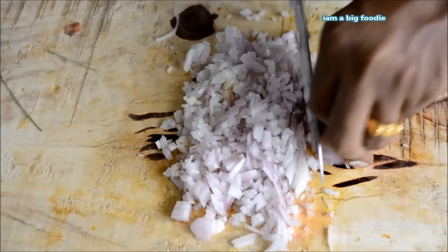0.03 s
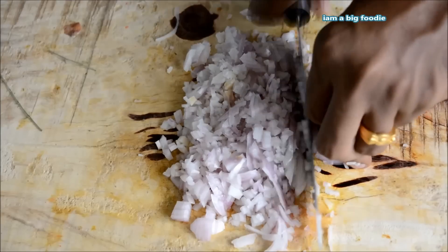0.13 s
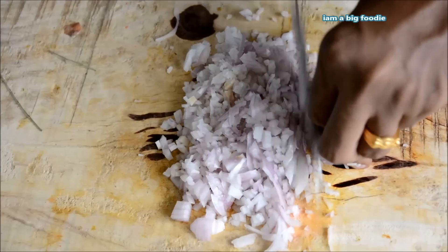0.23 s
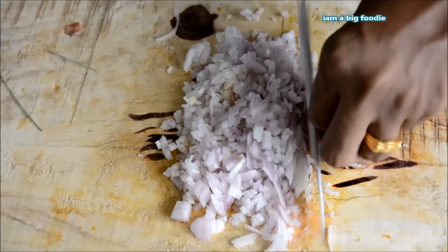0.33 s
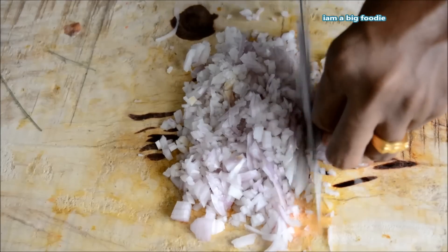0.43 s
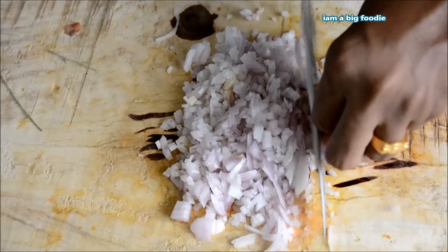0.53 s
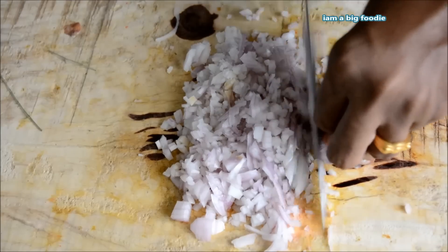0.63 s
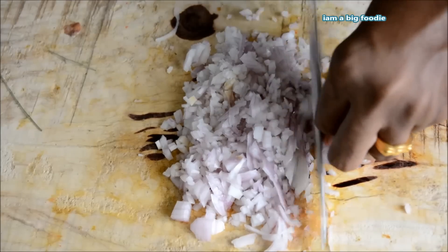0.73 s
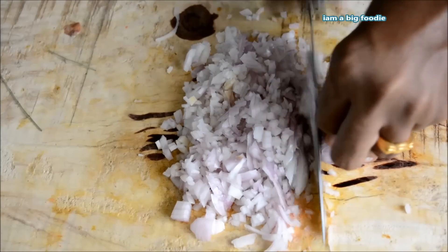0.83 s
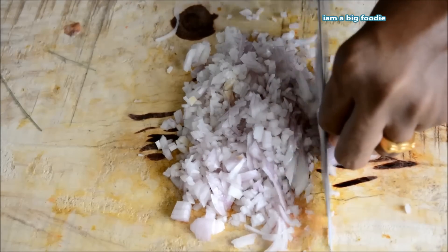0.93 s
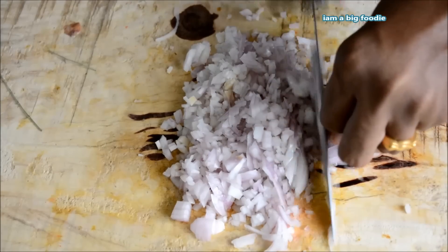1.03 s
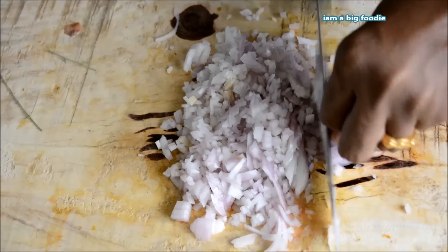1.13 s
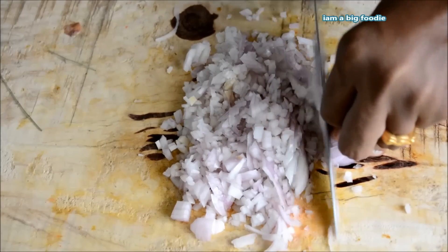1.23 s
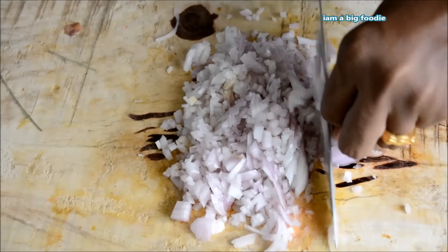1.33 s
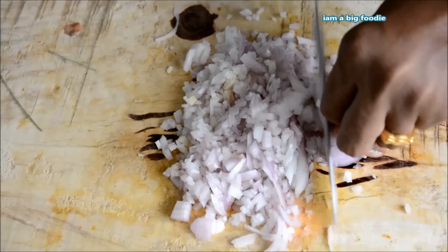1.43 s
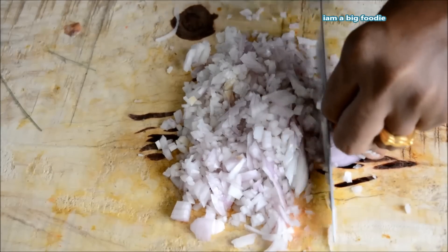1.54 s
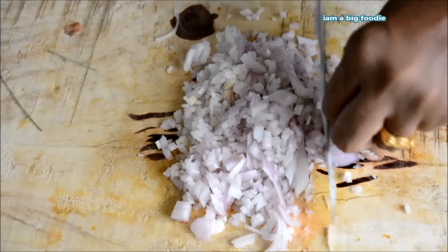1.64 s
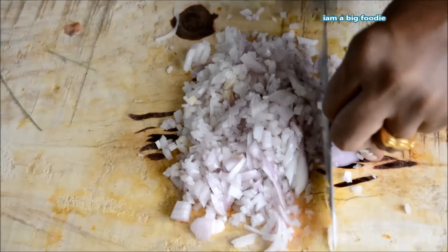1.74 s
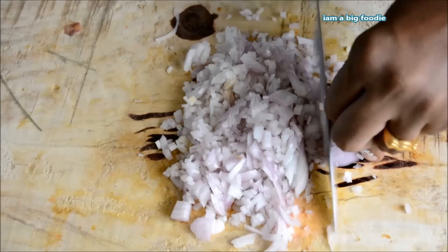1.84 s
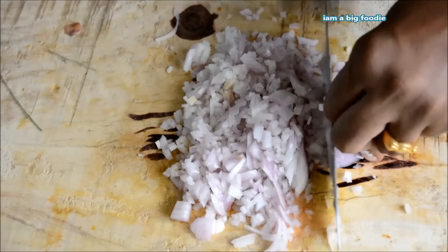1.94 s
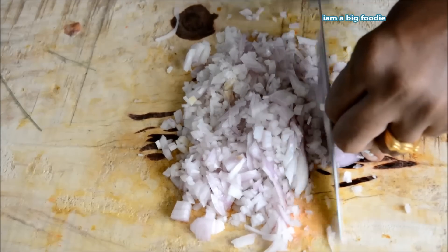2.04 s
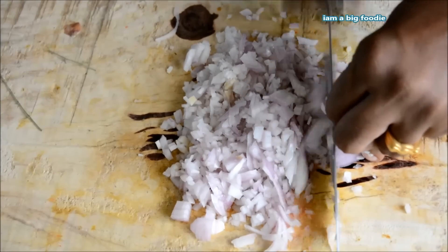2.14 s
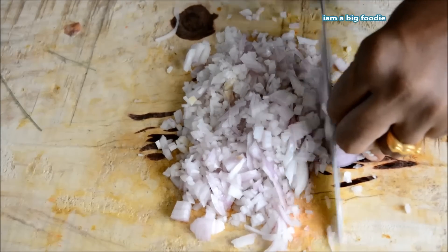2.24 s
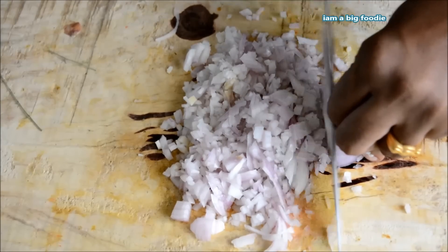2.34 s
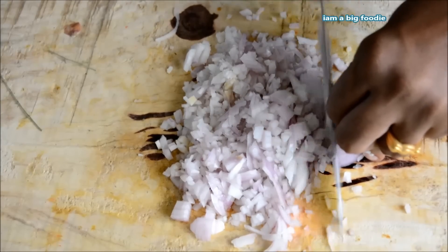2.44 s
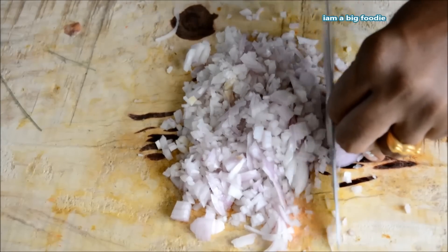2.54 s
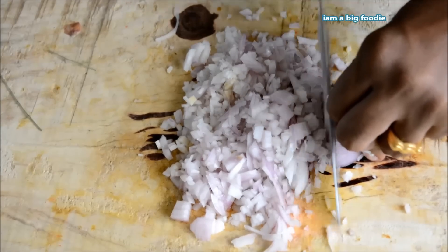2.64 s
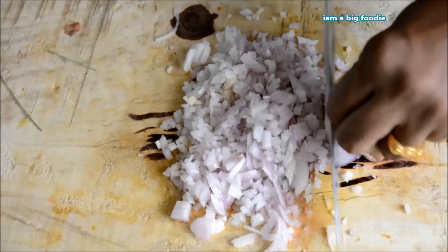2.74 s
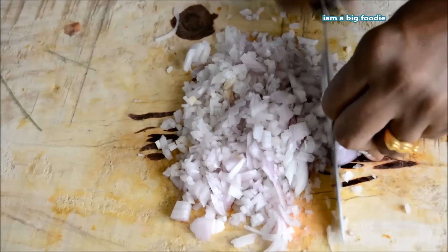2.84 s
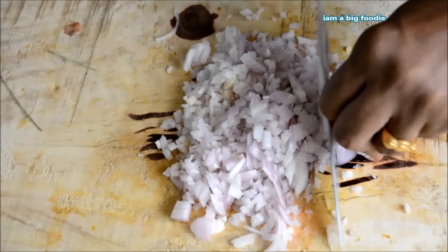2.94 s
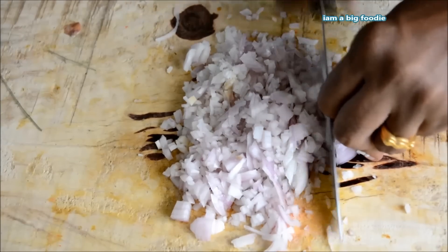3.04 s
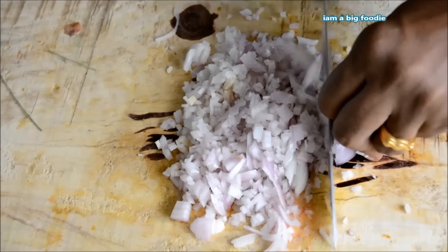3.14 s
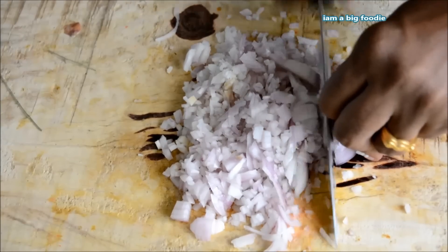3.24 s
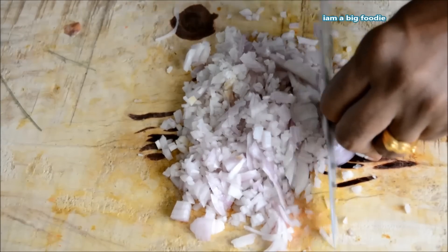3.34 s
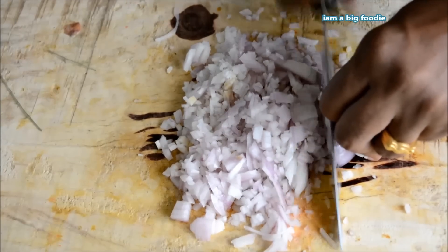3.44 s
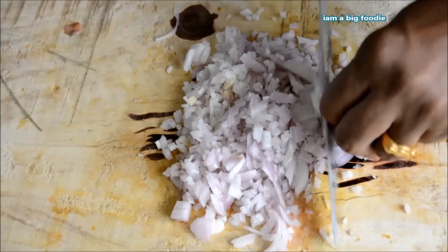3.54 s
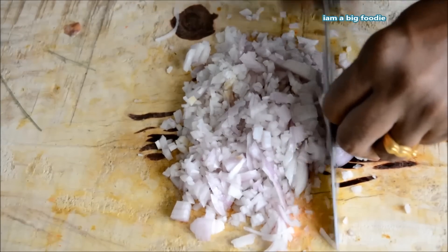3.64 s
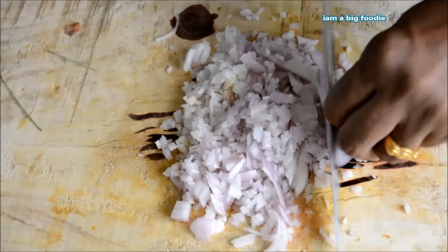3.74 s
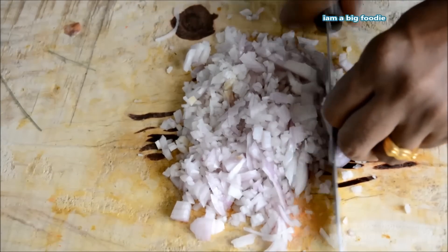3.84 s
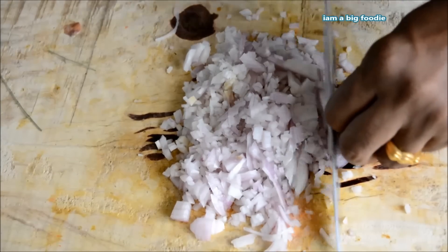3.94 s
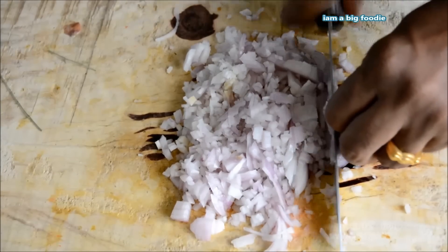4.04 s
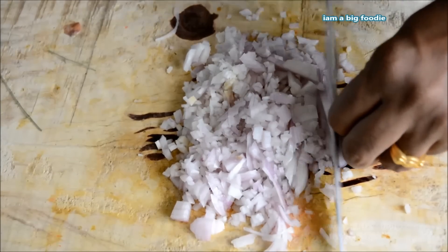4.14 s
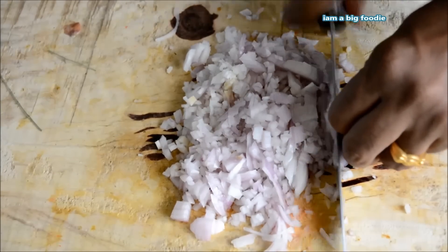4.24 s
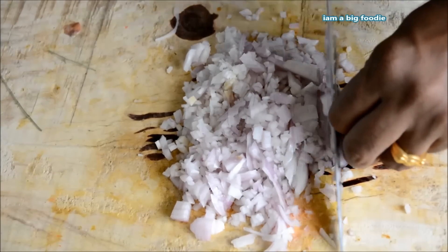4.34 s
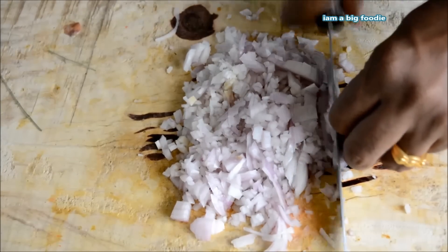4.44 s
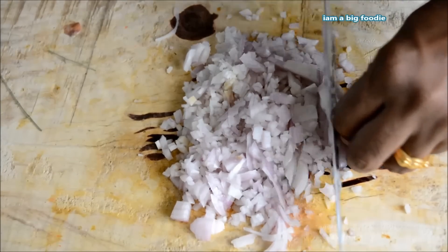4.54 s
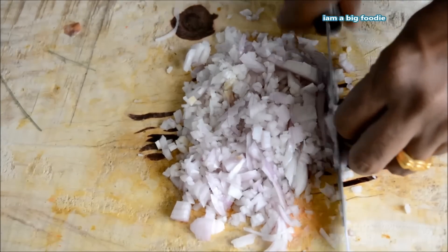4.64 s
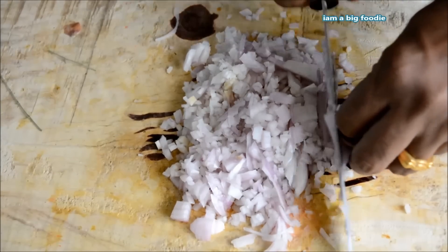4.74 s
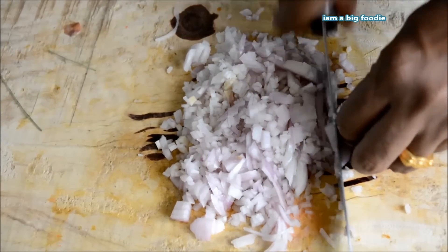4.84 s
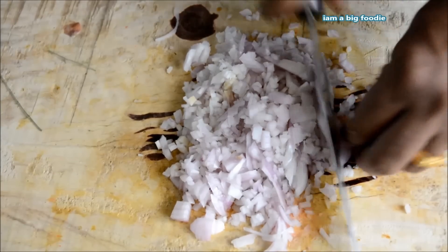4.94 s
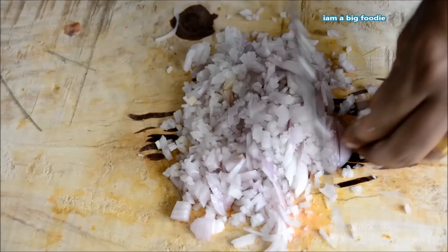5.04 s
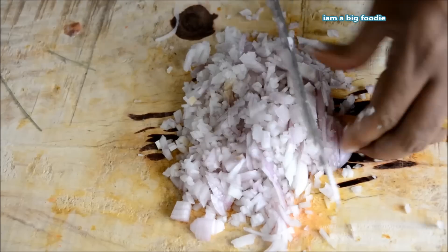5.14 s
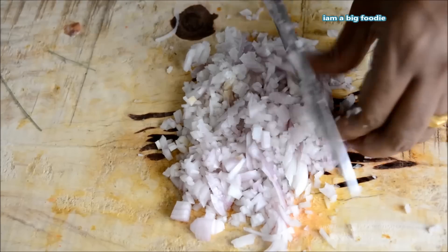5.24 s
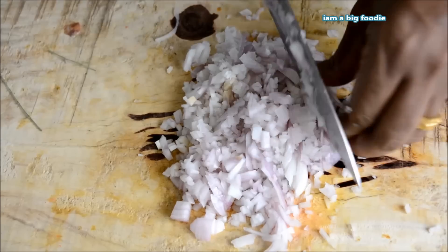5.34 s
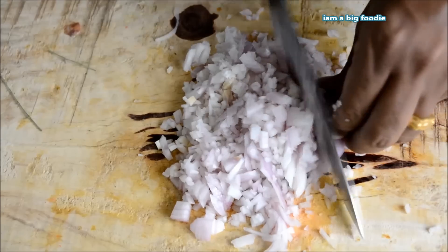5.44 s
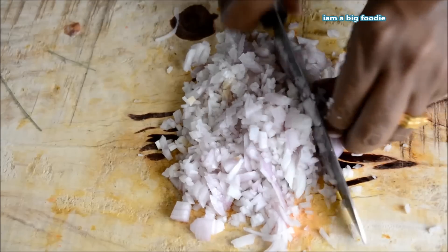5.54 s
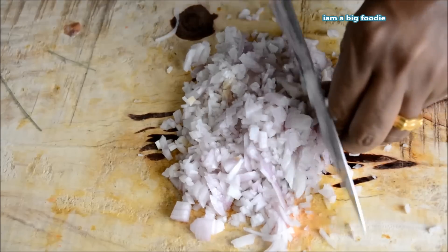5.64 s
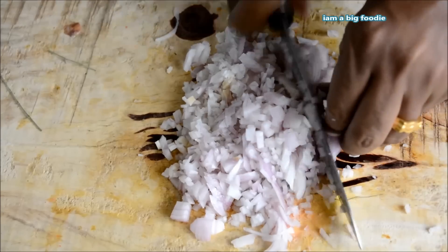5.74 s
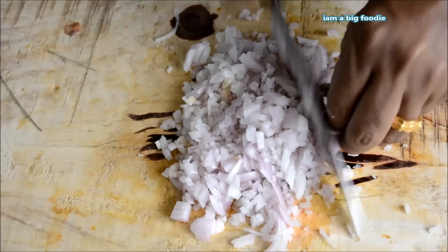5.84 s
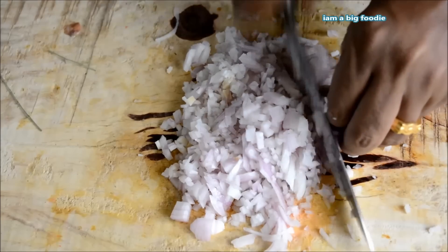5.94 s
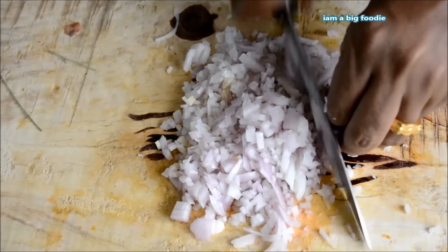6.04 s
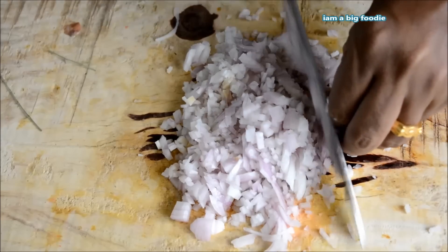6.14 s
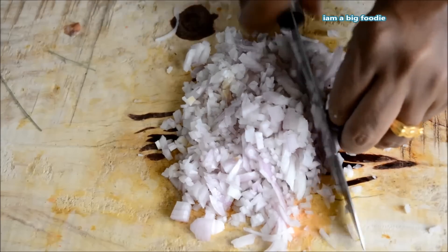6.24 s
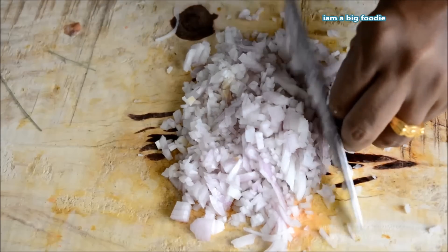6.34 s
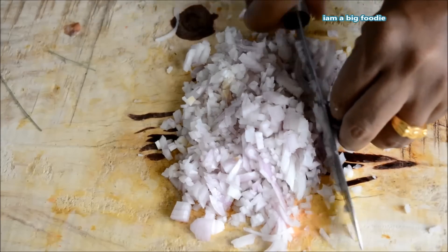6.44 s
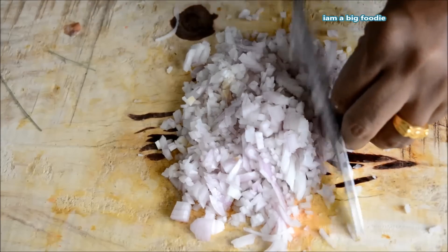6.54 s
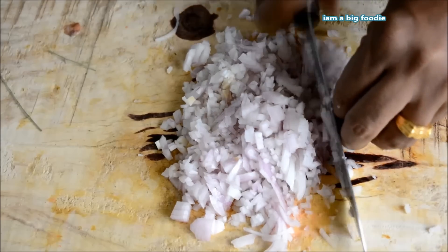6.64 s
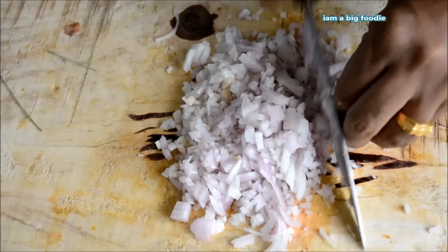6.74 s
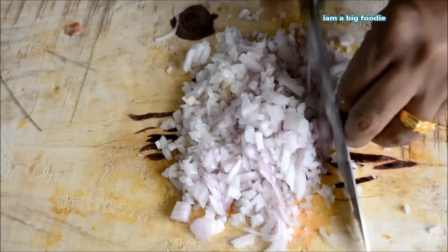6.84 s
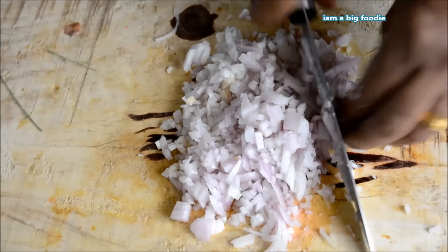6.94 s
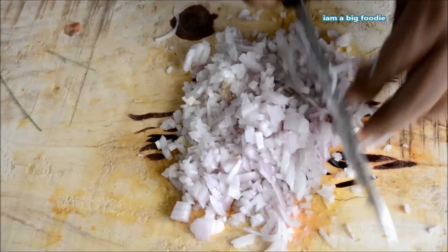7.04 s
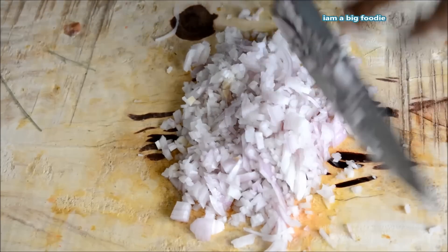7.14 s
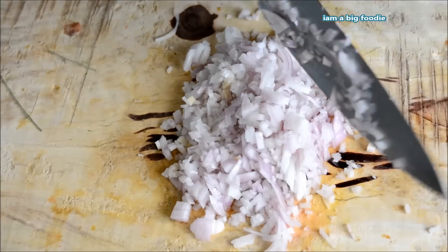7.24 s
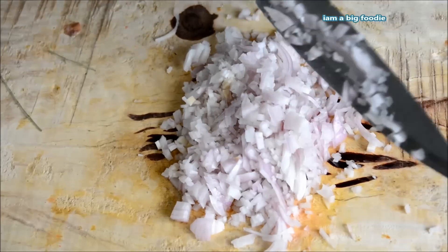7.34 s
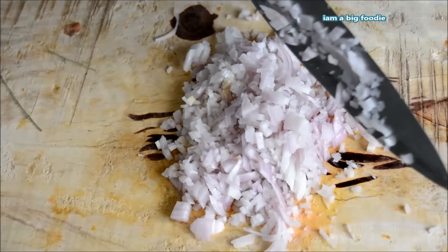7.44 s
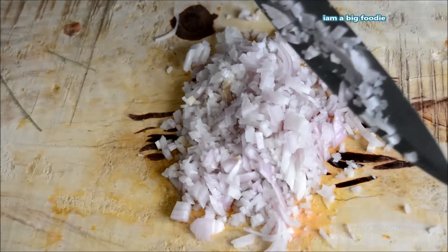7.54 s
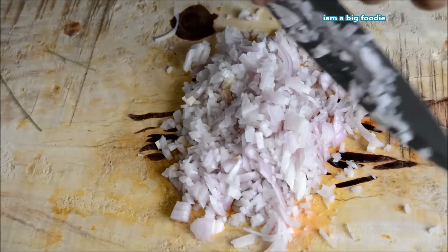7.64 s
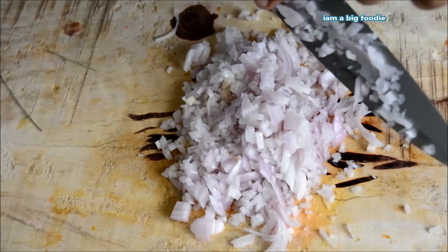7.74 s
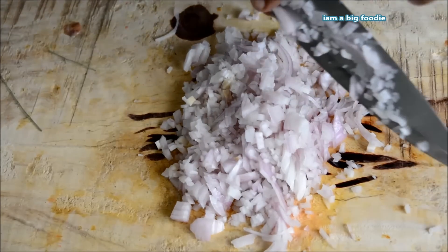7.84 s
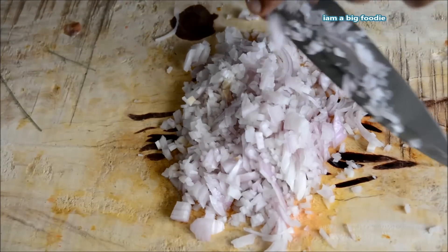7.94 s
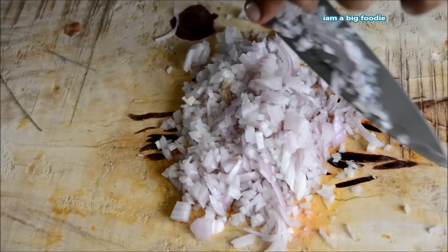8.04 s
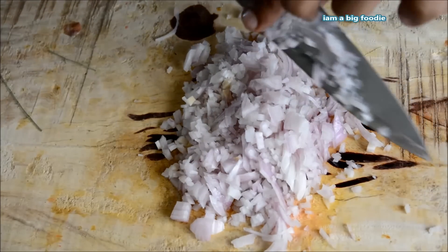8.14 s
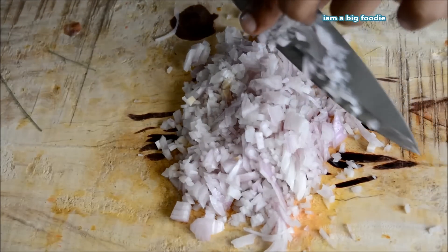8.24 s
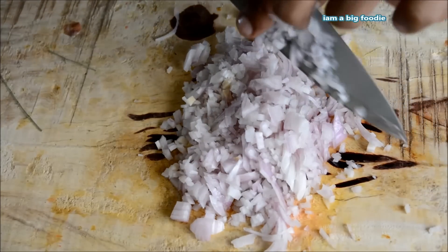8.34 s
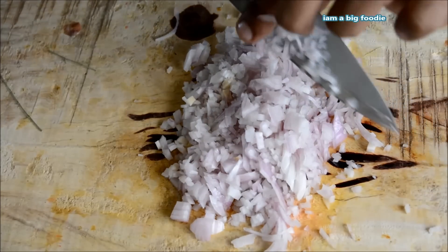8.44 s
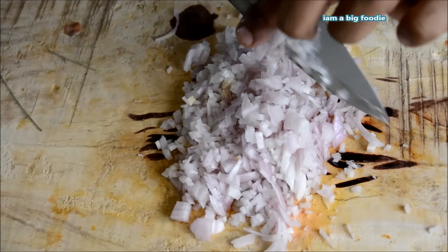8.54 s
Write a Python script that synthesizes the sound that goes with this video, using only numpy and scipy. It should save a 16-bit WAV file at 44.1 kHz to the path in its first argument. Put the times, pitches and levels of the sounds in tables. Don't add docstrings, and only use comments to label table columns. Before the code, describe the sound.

Close up, a knife chops onion on a thick wooden board, about five sharp knocks per second, each preceded by a tiny crisp crunch and followed by a dull low counter boom. After nearly five seconds it pauses briefly, then six slightly softer, slower chops follow. The end is quiet: very faint fingers brushing the blade and faint fan hum in a hard-walled kitchen. The hardest blows distort slightly.

```python
import sys
import numpy as np
from scipy import signal
from scipy.fft import rfft, irfft
from scipy.io import wavfile
from scipy.ndimage import uniform_filter1d

SR = 44100
rng = np.random.default_rng(int(sys.argv[2]) if len(sys.argv) > 2 else 0)


def wav_record(signal):
    frames = np.transpose(np.atleast_2d(signal))
    bounded = np.clip(frames, -1, 1)
    quanta = np.round(bounded * 32767).astype(np.int16)
    wavfile.write(sys.argv[1], SR, quanta)


def volts(x):
    e = np.asarray(x, float) / 20
    return 10 ** e


N = 378364

# pitch_hz [Hz], level_db [dB per Hz]
AIR_MID_SPECTRUM = [(30, -20.5), (80, -20), (165, -1.5), (300, -8), (600, -7), (1200, -8), (2000, -14.5),
                    (4000, -23.5), (8000, -29.5), (12000, -35), (16000, -44)]
AIR_SIDE_SPECTRUM = [(30, -51.5), (150, -29), (460, -5.5), (1300, -4), (6900, -19.5), (11000, -28.5),
                     (16000, -42)]
# time_s [s], level_db [dB rms]
AIR_DRIFT = [(0, -64.5), (5.2, -65), (5.5, -67.5), (7.5, -69.5), (8.58, -68.5)]
# middle_s [s], half_length_s [s], pitch_hz [Hz], level_db [dB rms]
MOTOR_SWELLS = [(0.03, 0.18, 593, -74), (5.451, 0.16, 350, -73), (7.478, 0.22, 350.5, -72),
                (8.097, 0.096, 348, -79), (8.15, 0.26, 521, -80.5), (8.58, 0.19, 351, -75.5)]
# middle_s [s], half_length_s [s], level_db [dB rms]
DRONE_SWELL = (8.47, .3, -75.5)
# pitch_hz [Hz], level_db [dB rms]
WHINES = [(294, -88.5), (1136, -86), (6422, -95), (8926, -104)]
# delay_s [s], level_db [dB]
WALL_ECHOES = [(.0105, -17), (.0238, -12), (.040, -20), (.050, -19), (.072, -24)]
# pitch_hz [Hz], t60_s [s], reverberant_db [dB], side_minus_mid_db [dB]
ROOM_TAIL = [(100, 0.37, -3, -34.5), (300.7, 0.64, 11.5, -31.5), (710, 0.68, -5, -27),
             (1056, 0.48, -4, -18.5), (1563, 0.52, -6.5, -21.5), (2160, 0.6, -4, -14),
             (2470, 0.5, -1.5, -16), (3740, 0.54, -4.5, -16), (6476, 0.19, 4.5, -19.5),
             (11000, .33, 0, -18)]
# pitch_hz [Hz], level_db [dB], t60_s [s]
COUNTER_MODES = [(105, 2.5, 0.17), (118.7, -6, 0.24), (62.3, -25.5, .3)]
# start_s [s], length_s [s], end_db [dB]
SLICES = [(0.115, 0.071, -61), (0.344, 0.047, -56.5), (0.558, 0.044, -56), (0.747, 0.055, -53),
          (0.95, 0.053, -51.5), (1.146, 0.058, -51.5), (2.141, 0.046, -53), (2.342, 0.02, -58.5),
          (3.37, 0.035, -53), (3.775, 0.042, -53), (3.985, 0.036, -55.5), (4.396, 0.03, -56),
          (5.436, 0.073, -60), (5.709, 0.053, -53.5), (5.953, 0.031, -52), (6.181, 0.05, -55),
          (6.403, 0.057, -58), (6.647, 0.039, -52.5), (6.845, 0.04, -56)]
# start_s [s], length_s [s], end_db [dB]
SPLITS = [(1.377, 0.026, -65.5), (1.723, 0.11, -74), (1.949, 0.035, -59.5), (2.542, 0.024, -66.5),
          (2.768, 0.029, -56.5), (2.978, 0.028, -61.5), (3.156, 0.046, -75.5), (3.589, 0.0079, -54.5),
          (4.19, 0.046, -64.5), (4.809, 0.044, -62.5)]
# pitch_hz [Hz], level_db [dB]
CRUNCH_COLOUR = [(400, -25.5), (800, 6), (1500, 3), (3500, -4.5), (6100, -10.5), (8100, -6.5), (10900, -9),
                 (13500, -16), (16000, -37)]
# start_s [s], peak_db [dB], pitch_hz [Hz]
SNAPS = [(0.181, -40, 9000), (0.2808, -60.5, 8900), (0.404, -24, 10500), (0.5082, -41.5, 10900),
         (5.9304, -59.5, 8060), (5.617, -57, 9500), (6.5794, -60, 11500), (6.6, -53, 8500),
         (6.6283, -53, 7000), (8.3439, -71.5, 6420)]
# middle_s [s], level_db [dB], length_s [s]
BRUSHES = [
    (5.144, -89, .05),
    (7.423, -76, 0.033),
    (7.964, -76, .03),
    (8.42, -77, .04),
]
# start_s [s], peak_db [dB], dull modes dull_db [dB], bright modes bright_db [dB]
CHOPS = [(0.129, -10, -16.5, -19), (0.3849, -6, -13, -15.5), (0.603, -8, -14, -18), (0.797, -6, -14, -15.5),
         (1.003, -15.5, -3, -25.5), (1.2042, -16.5, -5.5, -23), (1.3506, -6.5, -17, -16),
         (1.5503, -1, -22, -17.5), (1.7631, 1, -19.5, -13), (1.982, -4, -15, -16),
         (2.1928, -6.5, -16.5, -23), (2.373, 0.5, -18.5, -12), (2.5733, 0.5, -16.5, -11),
         (2.8023, -3, -15.5, -13), (3.0014, -1, -21, -14.5), (3.1875, 0.5, -20, -13),
         (3.4119, -4, -16, -11.5), (3.611, -1, -16.5, -13), (3.8107, -8.5, -16.5, -16),
         (4.0104, -8, -20.5, -14), (4.2198, -5.5, -14, -12), (4.422, -7, -19.5, -13.5),
         (4.6267, -0.5, -20.5, -12.5), (4.8091, -10.5, -16.5, -11), (5.4866, -6.5, -18, -17),
         (5.7435, -8, -17, -18), (5.9657, -5, -19.5, -15.5), (6.21, -11.5, -16, -21),
         (6.4219, -12.5, -19.5, -21), (6.6486, -5.5, -21.5, -17.5)]
# pitch_hz [Hz], level_db [dB], t60_s [s], first_swing [+-1]
BOARD_MODES = [(306.2, -30, 0.05, 1), (420.6, -28.5, 0.038, -1), (633, -2, .025, 1), (815.4, 6, 0.02, -1),
               (1044, -3, 0.032, 1), (1180, -13.5, .045, 1), (1395, -4, .042, -1), (1720, -1.2, .011, 1),
               (1569, -39, 0.11, 1), (1994, 0, 0.022, 1), (2615, 4.5, 0.018, 1), (2906, -11.5, 0.084, 1),
               (3609, 4.5, 0.02, -1), (4240, 11, 0.01, 1), (4723, -10, 0.0099, -1), (6240, -8.5, 0.014, 1)]
# pitch_hz [Hz], level_db [dB]
TICK_COLOUR = [(150, -46.5), (350, -27.5), (700, 8), (1300, 4.5), (2250, 6), (3400, 11), (5000, 2),
               (7000, -4), (11000, -10.5), (16000, -32.5)]

AIR_SIDE_DB = -77.5
DRONE_HZ, DRONE_WIDTH_HZ, DRONE_DB = 158, 25, -88.5
KITCHEN_DB, KITCHEN_RISE_S, NEAR_SIDE_DB, ECHO_TOP_HZ = -4.5, 0.013, -1, 2550
SHIFT_RAD, SHIFT_S = 0.7, 0.2
COUNTER_DB, COUNTER_RISE_S, COUNTER_SPOT_DB, COUNTER_DETUNE = -11.5, 0.12, 2, 0.015
CRUNCH_DB, CRUNCH_RISE_S, CRUNCH_FADE_S = 9, 0.00359, 0.009
CELLS_PER_S, CELL_DB, LAYER_DB, LAYER_S = 41000, 2, 3, 0.003
SLICE_DB_PER_S, SPLIT_DB_PER_S = 272.5, -110
THUD_HZ, DULL_HZ, BRIGHT_HZ, CRACK_HZ = 500, 1100, 1900, 3300
CRACK_DB, CRACK_PER_BRIGHT, CRACK_PER_PEAK = -11, 1.455, 0.4
THUD_DB, THUD_PER_DULL = -3, 0.25
BOARD_DB, BOARD_RISE_S, KNOCK_LOW_CUT_HZ = -1, 0.00016, 270
SPOT_DB, SPOT_DETUNE = 1.5, 0.014
TICK_DB, TICK_S, TICK_RISE_S = 1, 0.011, 0.0012
MIC_TOP_HZ, CEILING = 12590, 0.94


def shade(x, points):
    hz, db = np.transpose(points)
    f = np.fft.rfftfreq(x.shape[-1], 1 / SR) + 1
    return irfft(rfft(x) * volts(np.interp(np.log(f), np.log(hz), db)), x.shape[-1])


def unit(x):
    return x / np.sqrt(np.mean(x ** 2))


def onset(t, rise):
    return 1 - np.exp(-t / rise)


def sine(t, hz):
    return np.sqrt(2) * np.sin(2 * np.pi * hz * t)


def ring(t, hz, gain, t60, rise):
    decay = np.exp(-np.log(1000) * t / t60[:, None])
    modes = gain[:, None] * np.sin(2 * np.pi * hz[:, None] * t) * decay
    return modes.sum(axis=0) * onset(t, rise)


def add(track, s, sound):
    i = int(s * SR)
    track[i:i + len(sound)] += sound[:len(track) - i]


def fans():
    t = np.arange(N) / SR

    def bump(middle, half, db):
        return volts(db) * np.exp(-((t - middle) / half) ** 4)

    air, drone, side_air = rng.standard_normal((3, N))
    mid = volts(np.interp(t, *np.transpose(AIR_DRIFT))) * unit(shade(air, AIR_MID_SPECTRUM))
    peak = [(DRONE_HZ - DRONE_WIDTH_HZ, -30), (DRONE_HZ, 0), (DRONE_HZ + DRONE_WIDTH_HZ, -30), (600, -90)]
    mid += (volts(DRONE_DB) + bump(*DRONE_SWELL)) * unit(shade(drone, peak))
    for middle, half, hz, db in MOTOR_SWELLS:
        mid += bump(middle, half, db) * sine(t, hz)
    for hz, db in WHINES:
        mid += volts(db) * sine(t, hz)
    return mid, volts(AIR_SIDE_DB) * unit(shade(side_air, AIR_SIDE_SPECTRUM))


def kitchen():
    hz, t60, db, side_db = np.transpose(ROOM_TAIL)
    t = np.arange(SR) / SR
    tail = np.zeros((2, SR))
    for f in 60 * 2 ** np.arange(0, 8.1, 0.5):
        band_shape = [(f / 2, -60), (f / 1.19, 0), (f * 1.19, 0), (f * 2, -60)]
        band = shade(rng.standard_normal((2, SR)), band_shape)
        fade = np.exp(-np.log(1000) * t / np.interp(np.log(f), np.log(hz), t60))
        tail += volts(np.interp(np.log(f), np.log(hz), db)) * band * fade
    tail *= onset(t, KITCHEN_RISE_S)
    mid, side = volts(KITCHEN_DB) * tail / np.sqrt(np.sum(tail[0] ** 2))
    mid[1], side[0], side[2] = 1, volts(NEAR_SIDE_DB), -volts(NEAR_SIDE_DB)
    walls = np.zeros(SR)
    for s, echo_db in WALL_ECHOES:
        walls[int(s * SR)] = volts(echo_db)
    mid = mid + signal.sosfilt(signal.butter(2, ECHO_TOP_HZ, fs=SR, output="sos"), walls)
    lead = SR // 20
    return np.roll(mid, lead), shade(np.roll(side, lead), np.transpose([hz, side_db])), lead


def counter():
    out = np.zeros(N)
    t = np.arange(SR // 2) / SR
    hz, db, t60 = np.transpose(COUNTER_MODES)
    for s, peak_db, dull_db, _ in CHOPS:
        share, tune = rng.standard_normal((2, len(hz)))
        gain = volts(db + COUNTER_SPOT_DB * share)
        boom = ring(t, hz * (1 + COUNTER_DETUNE * tune), gain, t60, COUNTER_RISE_S)
        boom_db = peak_db + THUD_DB + THUD_PER_DULL * dull_db + COUNTER_DB
        add(out, s, volts(boom_db) * boom * onset(t, COUNTER_RISE_S))
    return out


def crunch():
    bursts = rng.random(N) < CELLS_PER_S / SR
    cells = bursts * rng.standard_normal(N) * volts(CELL_DB * rng.exponential(size=N))
    hold = int(LAYER_S * SR)
    layers = np.repeat(rng.standard_normal(N), hold)[:N]
    cells = cells * volts(LAYER_DB * uniform_filter1d(layers, hold))
    effort = np.zeros(N)
    t = np.arange(SR // 5) / SR
    for cuts, slope in [(SLICES, SLICE_DB_PER_S), (SPLITS, SPLIT_DB_PER_S)]:
        for s, length, end_db in cuts:
            swell = volts(end_db + slope * np.minimum(t - length, 0)) * onset(t, CRUNCH_RISE_S)
            add(effort, s, swell * np.exp(-np.maximum(t - length, 0) / CRUNCH_FADE_S))
    return volts(CRUNCH_DB) * effort * unit(shade(cells, CRUNCH_COLOUR))


def snaps():
    out = np.zeros(N)
    t = np.arange(SR // 5) / SR
    for s, db, hz in SNAPS:
        add(out, s, volts(db) * np.sin(2 * np.pi * hz * t) * np.exp(-t / 0.0002) * onset(t, 0.0001))
    return out


def brushes():
    t = np.arange(N) / SR
    stroke = np.zeros(N)
    for s, db, length in BRUSHES:
        stroke += volts(db) * np.exp(-((t - s) / length) ** 2)
    colour = [(500, -16), (1500, 15), (5000, 4), (9000, -31), (16000, -33)]
    return stroke * unit(shade(rng.standard_normal(N), colour))


def blow_colour(hz, peak_db, dull_db, bright_db):
    thud_db = THUD_DB + THUD_PER_DULL * dull_db
    crack_db = CRACK_DB + CRACK_PER_BRIGHT * bright_db + CRACK_PER_PEAK * peak_db
    regions = [hz < THUD_HZ, hz < DULL_HZ, hz > CRACK_HZ, hz > BRIGHT_HZ]
    return np.select(regions, [thud_db, dull_db, crack_db, bright_db])


def board():
    out = np.zeros(N)
    hz, db, t60, swing = np.transpose(BOARD_MODES)
    tick_hz, tick_db = np.transpose(TICK_COLOUR)
    t = np.arange(SR // 10) / SR
    for s, peak_db, dull_db, bright_db in CHOPS:
        mode_db = db + blow_colour(hz, peak_db, dull_db, bright_db)
        burst_db = tick_db + blow_colour(tick_hz, peak_db, dull_db, bright_db)
        share, tune = rng.standard_normal((2, len(hz)))
        gain = np.sign(swing) * volts(mode_db + SPOT_DB * share)
        knock = ring(t, hz * (1 + SPOT_DETUNE * tune), gain, t60, BOARD_RISE_S)
        usual = ring(t, hz, np.sign(swing) * volts(mode_db), t60, BOARD_RISE_S)
        knock *= np.abs(usual).max() / np.abs(knock).max()
        burst = shade(rng.standard_normal(len(t)), np.transpose([tick_hz, burst_db]))
        tick = volts(TICK_DB) * burst * np.exp(-t / TICK_S) * onset(t, TICK_RISE_S)
        add(out, s, volts(peak_db + BOARD_DB) * (knock + tick))
    return signal.sosfilt(signal.butter(4, KNOCK_LOW_CUT_HZ, "high", fs=SR, output="sos"), out)


def in_room(near, turn, room, moved, lead):
    steady = signal.fftconvolve(near, (room + moved) / 2)
    shifting = signal.fftconvolve(near * turn, (room - moved) / 2)
    return (steady + shifting)[lead:lead + N]


def scene():
    hum, hiss = fans()
    mid_room, side_room, lead = kitchen()
    mid_moved, side_moved, _ = kitchen()
    near = board() + crunch() + snaps() + brushes()
    knots = np.arange(0, N / SR + SHIFT_S, SHIFT_S)
    turn = SHIFT_RAD * np.interp(np.arange(N) / SR, knots, rng.standard_normal(len(knots)))
    mid = in_room(near, turn, mid_room, mid_moved, lead) + counter() + hum
    side = in_room(near, turn, side_room, side_moved, lead) + hiss
    return np.array([mid + side, mid - side])


def low_pass(x):
    return signal.sosfilt(signal.butter(12, 16390, fs=SR, output="sos"), x)


def record(dry):
    heard = signal.sosfilt(signal.butter(2, MIC_TOP_HZ, fs=SR, output="sos"), dry)
    mix = np.clip(heard, -CEILING, CEILING)
    return low_pass(mix)


dry = scene()
out = record(dry)
wav_record(out)
```